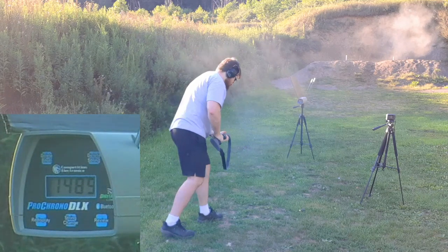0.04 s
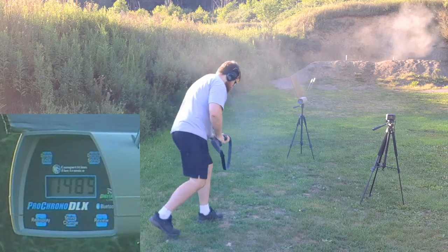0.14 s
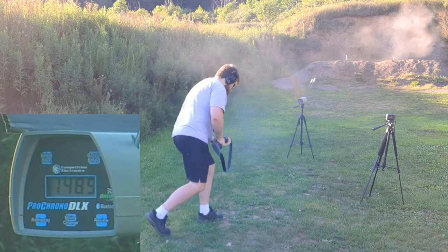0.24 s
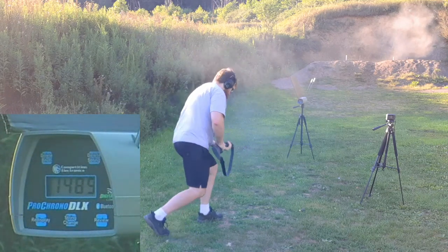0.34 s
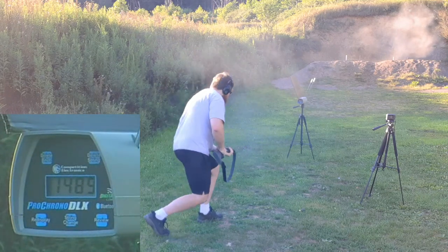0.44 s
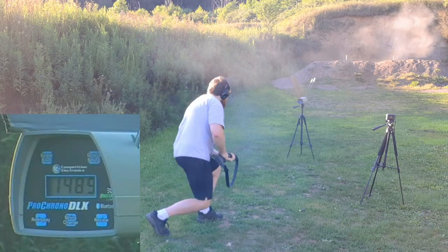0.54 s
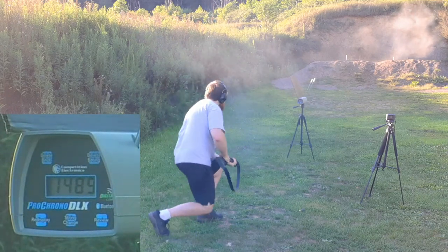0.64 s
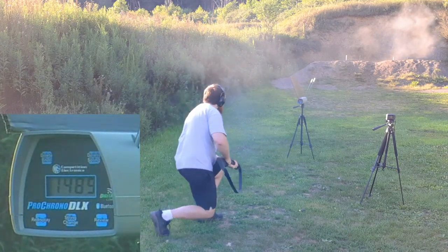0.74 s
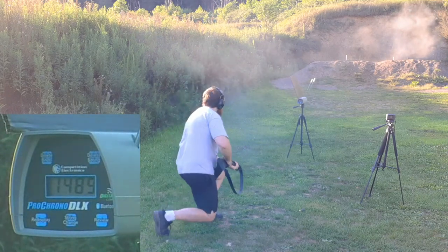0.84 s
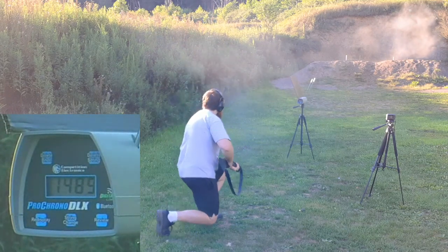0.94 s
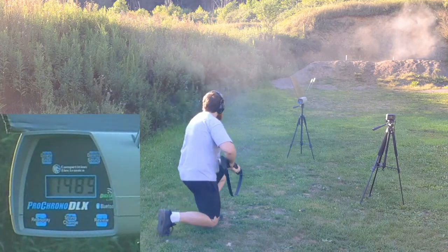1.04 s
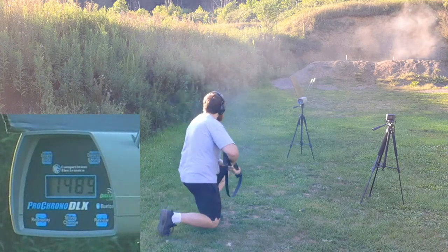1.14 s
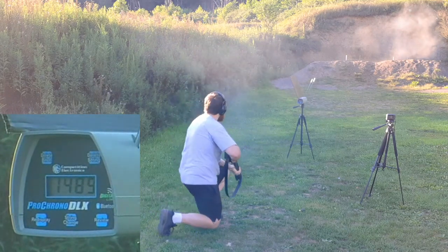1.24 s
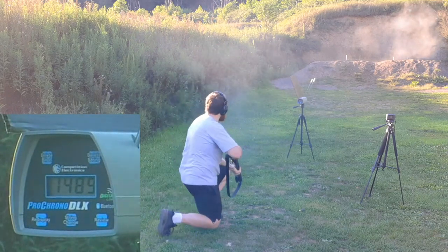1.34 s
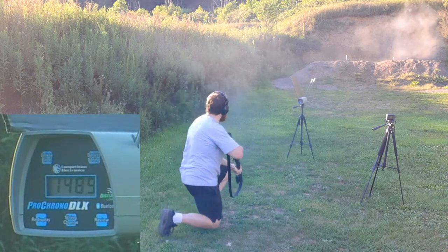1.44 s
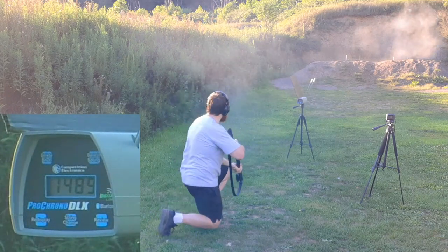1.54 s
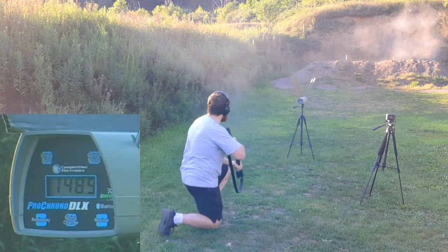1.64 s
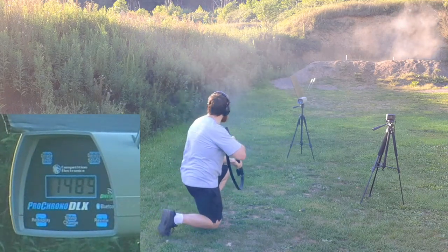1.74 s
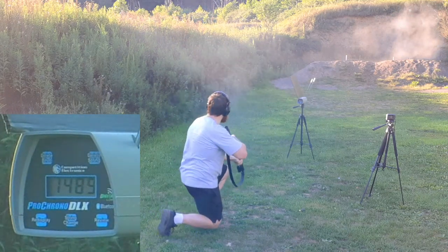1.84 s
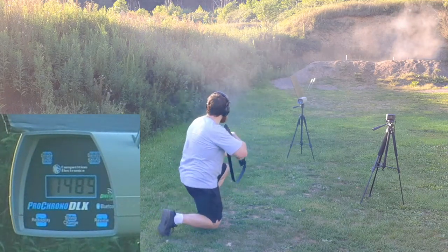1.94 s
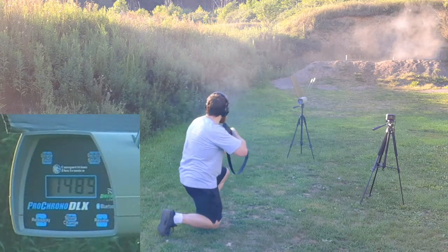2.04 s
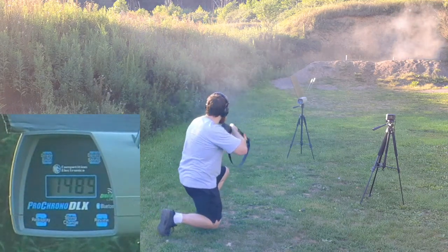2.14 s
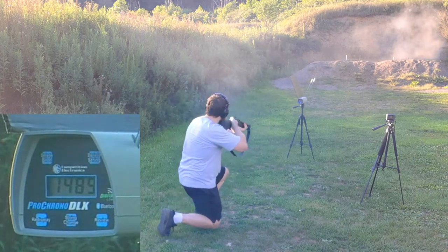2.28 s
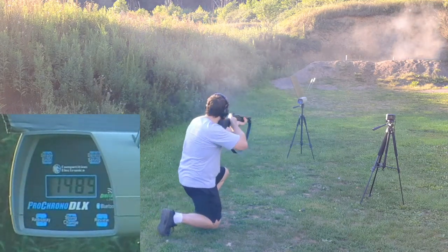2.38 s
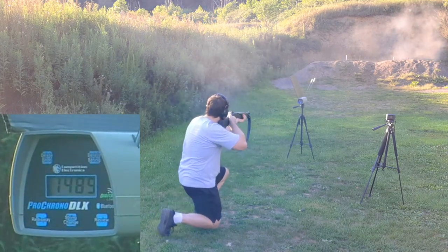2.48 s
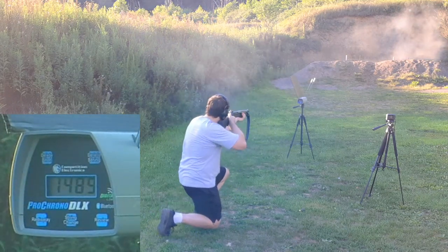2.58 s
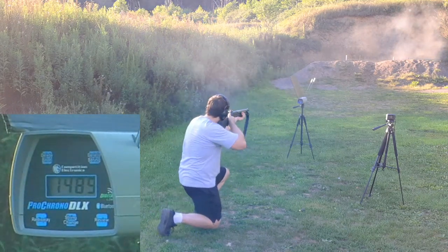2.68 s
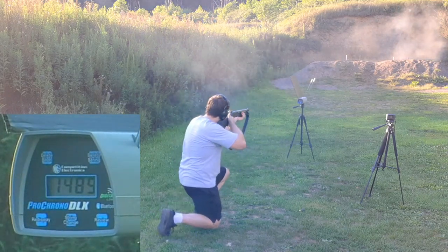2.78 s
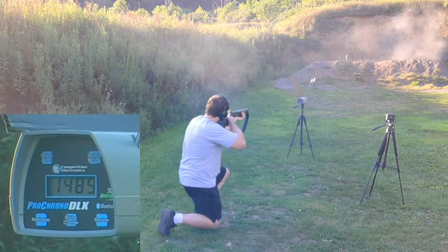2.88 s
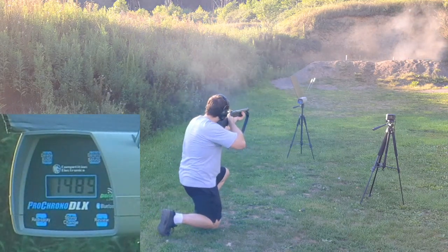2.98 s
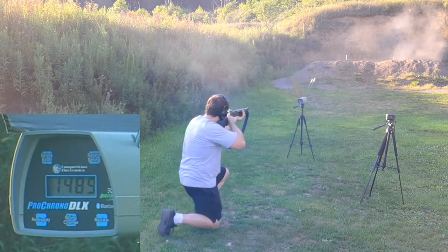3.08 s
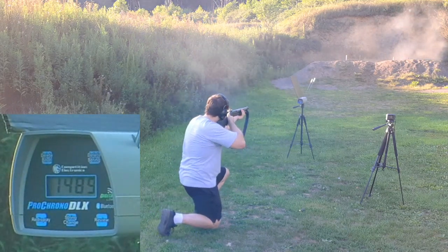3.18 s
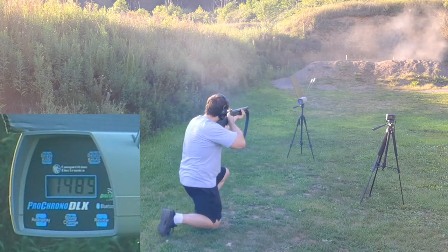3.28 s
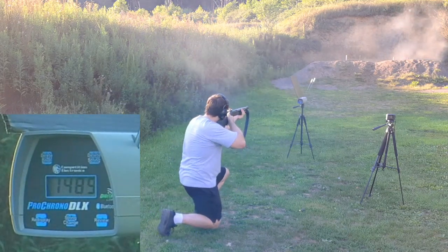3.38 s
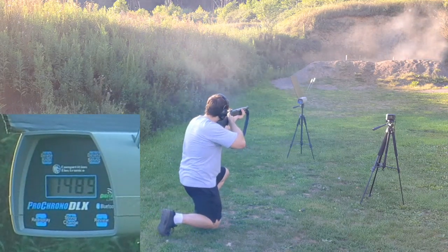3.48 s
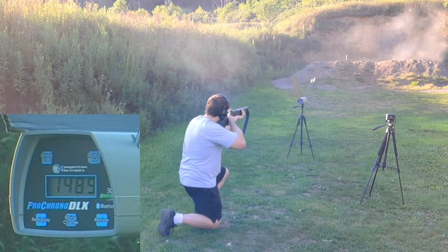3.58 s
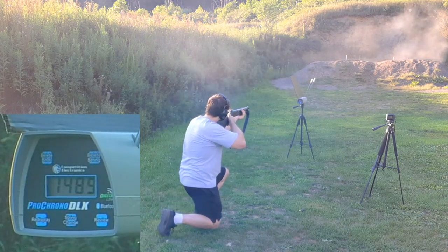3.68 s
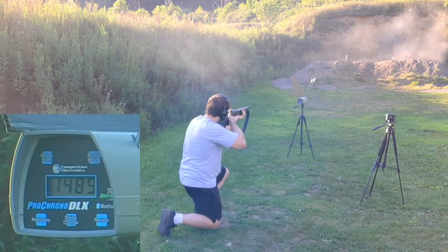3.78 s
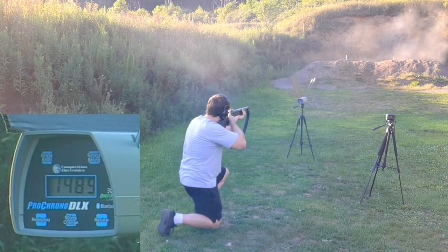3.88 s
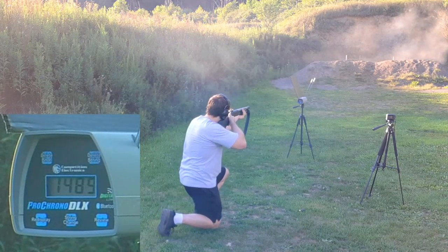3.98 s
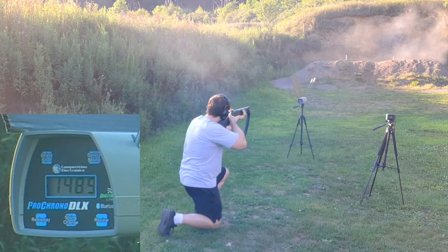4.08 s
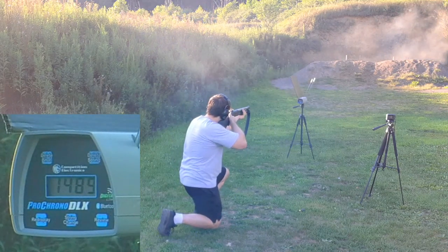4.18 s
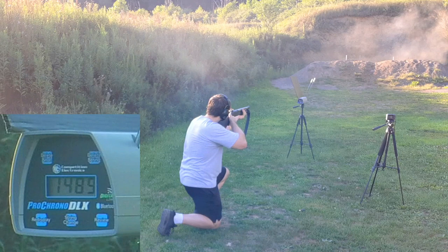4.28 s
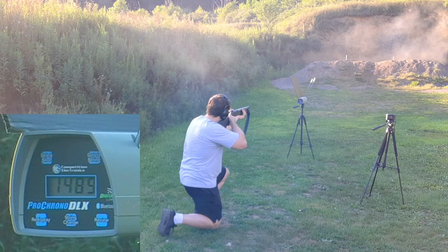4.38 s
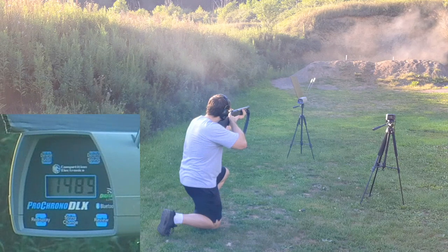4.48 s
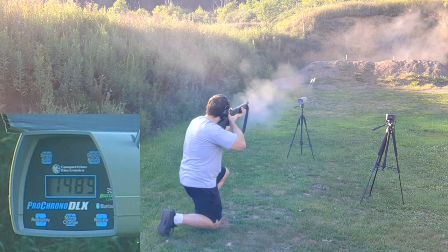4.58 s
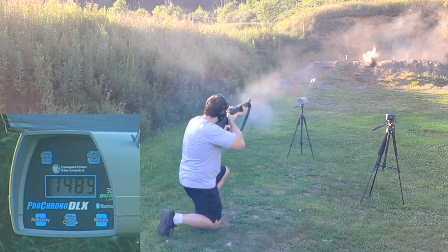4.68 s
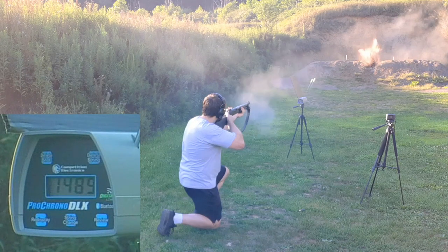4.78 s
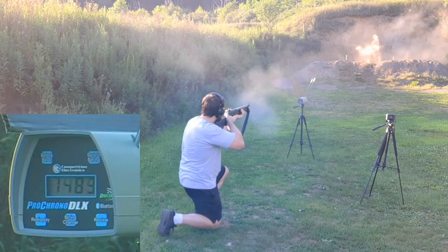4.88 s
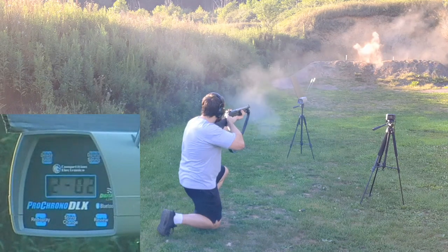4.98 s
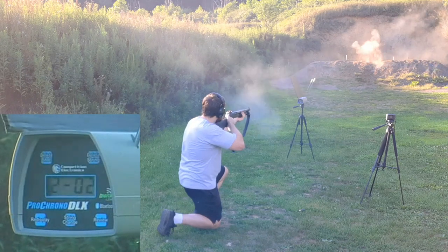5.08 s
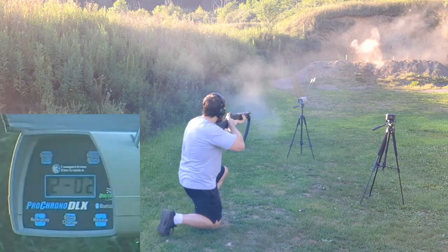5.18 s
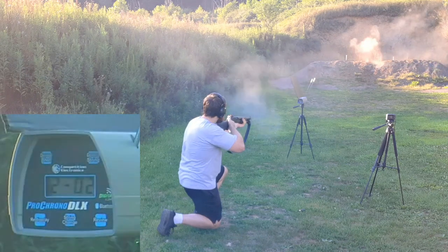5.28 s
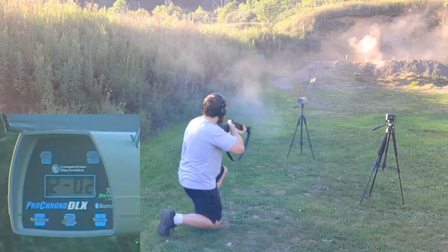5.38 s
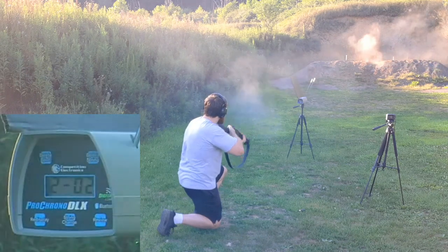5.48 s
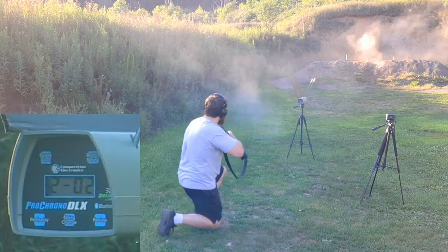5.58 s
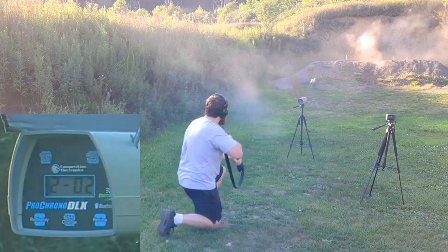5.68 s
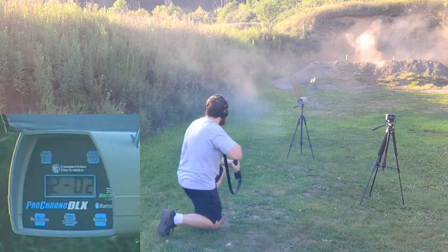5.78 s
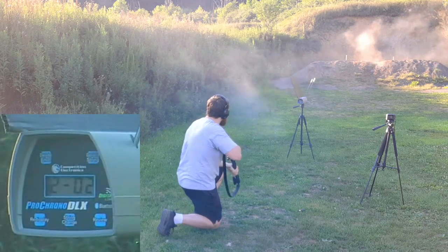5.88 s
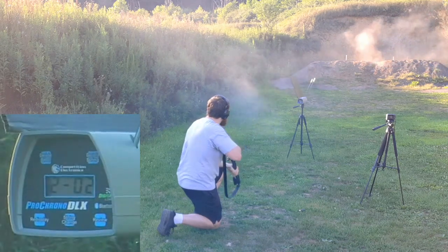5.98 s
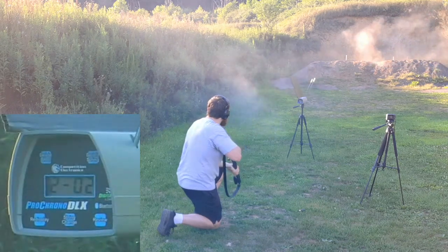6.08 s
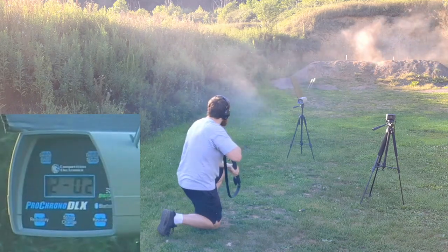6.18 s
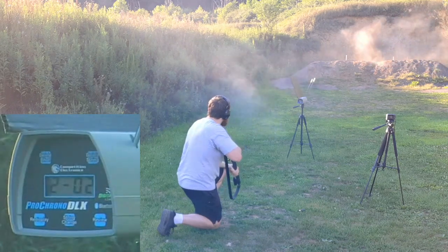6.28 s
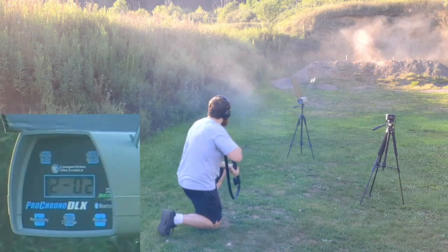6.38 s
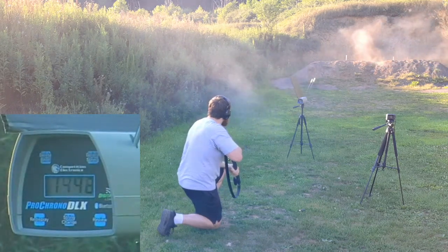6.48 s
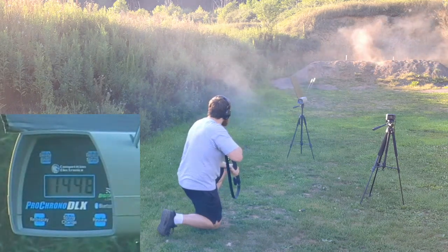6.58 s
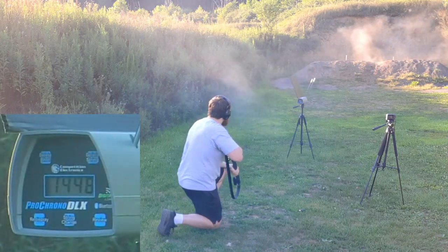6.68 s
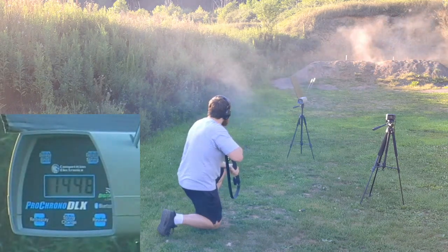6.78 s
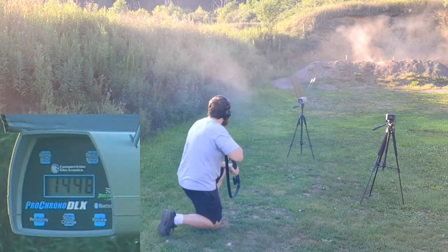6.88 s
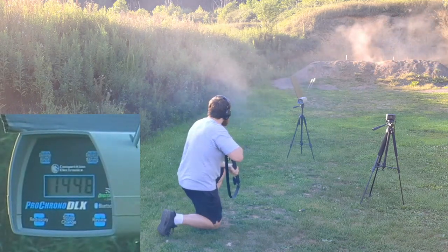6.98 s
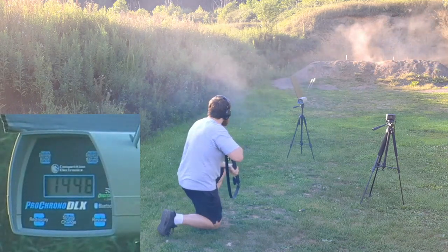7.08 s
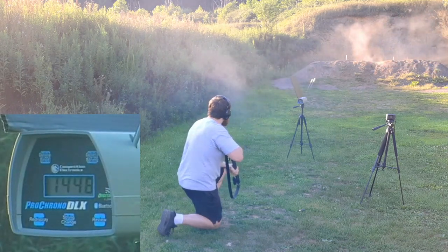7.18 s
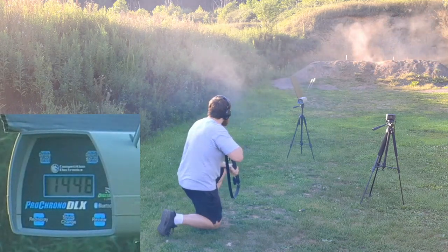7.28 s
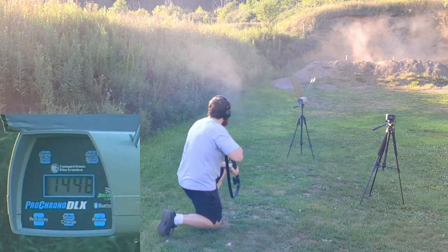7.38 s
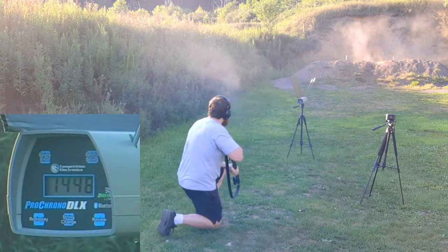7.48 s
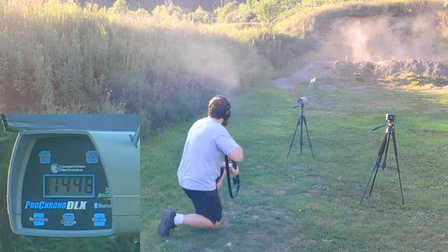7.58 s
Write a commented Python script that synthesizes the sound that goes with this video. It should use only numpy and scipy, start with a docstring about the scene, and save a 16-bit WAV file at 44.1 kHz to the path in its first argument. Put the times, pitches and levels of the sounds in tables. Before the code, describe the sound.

Outdoors on a grassy range in the evening, faint crickets chirp and trill over a high insect buzz and soft hiss. Small, dry metal clicks come from a gun being handled. After a quiet wait, a shotgun fires a few metres from the microphone, very loud, its wide stereo roar bouncing off banks and slopes and growing dull and lumpy. Clicks follow as the insects thinly return.

```python
"""A summer evening on a grassy range: crickets chirp and trill, and an insect chorus and air hiss lie behind.
A dying rustle of cloth comes first, then rasping katydids and clicks of a gun's metal, rung by short contacts.
At 4.8 s a shotgun fires, heard from a few metres behind; banks, scrub and far slopes return filtered noise
and pulses as a roar that turns dull and lumpy. The chorus and air treble sink: the upper band and treble
slowly return, the lower band stays down. More clicks follow while single crickets sing on."""
import sys
import numpy as np
from scipy import signal
from scipy.fft import rfft, irfft
from scipy.io import wavfile
from scipy.ndimage import uniform_filter1d

SR = 44100
rng = np.random.default_rng(int(sys.argv[2]) if len(sys.argv) > 2 else 0)


def file_out(sig):
    """Save sig as 16-bit WAV at sys.argv[1]."""
    # one column per channel
    cols = np.atleast_2d(sig).T
    # limit, then scale
    lim = np.clip(cols, -1, 1)
    pcm = np.round(lim * 32767).astype(np.int16)
    wavfile.write(sys.argv[1], SR, pcm)


N = 336483
T = np.arange(N) / SR  # s
HZ = np.arange(N // 2 + 1) * SR / N + 1e-3  # bin frequencies, kept above zero for the logarithms
SHOT_S = 4.7968


def undb(db):
    """Decibel law: amplitude ratio of a level."""
    return 10 ** (np.asarray(db) / 20)


def pan(x, db):
    """Interaural level difference: left and right copies, left db above right."""
    return x * undb(np.array([[db / 2], [-db / 2]]))


def ramp(start, length):
    """Linear transition: 0 before start, 1 after a further length seconds."""
    return np.clip((T - start) / length, 0, 1)


def colour(points):
    """Spectral shaping: gain per bin, interpolated in dB over log frequency."""
    hz, db = np.transpose(points)
    return undb(np.interp(np.log(HZ), np.log(hz), db))


def noise(side):
    """Mid-side decorrelation: spectra of left and right noise with the given side-to-mid ratio."""
    mid, off = rfft(rng.standard_normal((2, N)))
    return np.array([mid + side * off, mid - side * off])


def band(hz, width_hz, side_db):
    """Band-limited noise: a stereo Gaussian band scaled to rms 1."""
    bell = np.exp(-((HZ - hz) / width_hz) ** 2)
    x = irfft(noise(undb(side_db)) * bell, N)
    return x / x.std()


def walk(rate):
    """Random modulation: levels held 1 / rate s, smoothed twice, with spread 1."""
    hold = int(SR / rate)
    x = np.repeat(rng.standard_normal(N // hold + 1), hold)
    x = uniform_filter1d(uniform_filter1d(x, hold), hold)[:N]
    return x / x.std()


def add(out, s, sound):
    """Superposition: mix a short sound in at time s."""
    i = int(np.clip(s * SR, 0, N))
    out[..., i:i + sound.shape[-1]] += sound[..., :N - i]


# Spectrum of the first returns. Each row: frequency in Hz, density in dB per Hz (relative).
BLAST_SPECTRUM = [(18, -40.5), (30, -9.5), (139, -1.5), (255, -7), (388, 0), (506, -2.5), (562, -0.5),
                  (1450, -5.5), (1890, -4), (2400, -8), (3380, -5.5), (5740, -2), (14100, -16.5),
                  (15200, -17.5), (16500, -59)]
# Stereo width of the roar. Each row: frequency in Hz, side minus mid in dB.
ROAR_WIDTH = [(60, -11), (110, -15), (200, -4), (380, -7), (700, -1.5), (1290, -4), (2380, -4), (4400, -12),
              (8120, -9.5), (15000, 4)]
BLAST_DB = -14.5  # rms of the source, before its path losses


def scattered_blast():
    """Multiple scattering: the blast returns as diffuse noise mixed with separate random pulses."""
    # every bush and bank returns its own pulse: about 400 a second, uneven in size and side
    arrival, size, side = rng.random((3, N))
    pulses = (arrival < 400 / SR) * (2 * size - 1)
    sides = 1 + .5 * np.array([[1], [-1]]) * (2 * side - 1)
    pulses = rfft(pulses * sides) / pulses.std()
    # pulses stand out where the echo is strongest
    share = np.clip(.5 * np.exp(-np.log2(HZ / 520) ** 2), 0, 1)
    wash = noise(colour(ROAR_WIDTH))
    source = (np.sqrt(share) * pulses + np.sqrt(1 - share) * wash) * colour(BLAST_SPECTRUM)
    return source * undb(BLAST_DB) / irfft(source, N).std()


# Single reflections standing out of the roar.
# Each row: time in seconds, nominal peak in dB, frequency in Hz, left minus right in dB.
REFLECTIONS = [(4.8082, -21, 570, -7), (4.82, -19, 125.7, -1), (4.8333, -17, 247, 1),
               (4.8516, -17, 288, -2), (4.9325, -10, 320, 3), (4.9406, -5.5, 1090, 2),
               (4.9773, -6.5, 1240, 2), (4.992, -18, 125, -1), (4.9955, -22, 200, -3),
               (5.035, -9, 4200, -1), (5.0734, -7.5, 650, 2), (5.0816, -18, 440, -2), (5.1118, -9, 950, 0),
               (5.124, -13.5, 860, 1), (5.1891, -15, 393, 5), (5.242, -20, 550, -6),
               (5.2775, -18.5, 505, 5), (5.2893, -20.5, 460, -4), (5.3355, -21.5, 463, 5),
               (5.3716, -20.5, 503, -5), (5.7644, -25.5, 518, 4), (5.8397, -28.5, 559, -0.5),
               (6.073, -30.5, 460, -3), (6.0952, -32, 475.3, 1), (6.1285, -35, 710, 3),
               (6.228, -32.5, 478, 0), (6.4202, -40, 380, -2.5), (6.7497, -43, 398, 0.5),
               (6.975, -40, 460, -3)]


def single_reflections():
    """Specular reflection: each strong surface returns a brief pressure pulse."""
    out = np.zeros((2, N))
    t = T[:3000] - T[1500]
    for when, peak_db, hz, pan_db in REFLECTIONS:
        pulse = np.exp(-(t * hz / 1.13) ** 2) * np.sin(2 * np.pi * hz * t)
        add(out, when - T[1500], pan(undb(peak_db) * pulse, pan_db))
    return out


# Course of the returning roar. Each row: time in seconds, level relative to the first returns in dB,
# treble loss above the knee in dB per octave.
RETURN_COURSE = [(4.8, 2, 2), (4.92, -0.5, -1), (4.98, 0, 0), (5.03, -1, -1), (5.075, 0.5, 0.5),
                 (5.125, -2, 1.5), (5.17, -11.5, 1.5), (5.2, -5, 2.5), (5.25, -12, 1), (5.3, -9, 2.5),
                 (5.4, -11.5, 3), (5.55, -15.5, 4), (5.75, -19.5, 5), (5.95, -20.5, 4.5), (6.05, -19, 4.5),
                 (6.13, -19.5, 4.5), (6.22, -18.5, 5), (6.33, -22, 7), (6.45, -20, 7), (6.651, -24.5, 10),
                 (6.85, -28, 10.5), (7.1, -27.5, 14.5), (7.301, -34.5, 16), (7.63, -42.5, 16)]
# distant ground returns little bass: a bell-shaped dip over log frequency
THIN_S, THIN_OVER_S, THIN_DB, THIN_HZ, THIN_OCT = 5.0, .05, -26, 180.4, 0.63
FILL_S, FILL_WIDTH_S, FILL_DB = 6.4, .5, 15  # the far slope brings some bass back
KNEE_HZ, KNEE_SINK_OCT_PER_S = 596, 0.11  # the knee sinks as the echo comes from further off
BOOM_DB, BOOM_DROP_DB, BOOM_DROP_S, BOOM_DB_PER_S = 8.5, 10.5, .1, 21  # the deepest boom dies on its own
SURGE_FROM_S, SURGE_GROW_S = 5.05, 0.18  # the returns flutter more once they thin out
# Air loss at 10 kHz, growing with frequency squared, relative to the first returns' mean delay;
# near scrub keeps scattering, so the loss eases off.
AIR_DB_PER_S, AIR_FROM_S, AIR_EASE_S = 98.5, 0.079, 0.48


def roar():
    """Outdoor reverberation: bands of the scattered blast fade by path length, ground and air absorption."""
    s, level_points, dull_points = np.transpose(RETURN_COURSE)
    level_db = np.interp(T, s, level_points)
    dull_db = np.interp(T, s, dull_points)
    since = np.maximum(T - SHOT_S, 0)
    fill_db = FILL_DB * np.exp(-((T - FILL_S) / FILL_WIDTH_S) ** 2)
    thin_db = ramp(THIN_S, THIN_OVER_S) * (THIN_DB + fill_db)
    air_db = AIR_DB_PER_S * (AIR_EASE_S * (1 - np.exp(-since / AIR_EASE_S)) - AIR_FROM_S)
    boom_db = BOOM_DB - BOOM_DROP_DB * (1 - np.exp(-since / BOOM_DROP_S)) - BOOM_DB_PER_S * since
    flutter_db = 1.3 + 0.87 * ramp(SURGE_FROM_S, SURGE_GROW_S)

    source = scattered_blast()
    centres = np.array([90, 170, 270, 420, 660, 950, 1900, 3500, 5300, 7300, 10500, 14500])  # Hz
    out = 0
    for k, hz in enumerate(centres):
        # neighbouring bands cross over at constant power
        weight = np.interp(np.log(HZ), np.log(centres), np.arange(len(centres)) == k)
        part = irfft(source * np.sin(np.pi / 2 * weight), N)
        if k == 0:
            fade_db = boom_db
        else:
            octaves_above = np.maximum(np.log2(hz / KNEE_HZ) + KNEE_SINK_OCT_PER_S * since, 0)
            fade_db = level_db - dull_db * octaves_above - air_db * (hz / 10000) ** 2
            fade_db = fade_db + thin_db * np.exp(-(np.log2(hz / THIN_HZ) / THIN_OCT) ** 2)
        out = out + part * undb(fade_db + flutter_db * walk(40))
    return out * ramp(SHOT_S, 0.00031) + single_reflections()


# Handling of the gun. Each row: time in seconds, peak in dB, brightest frequency in Hz,
# decay time constant of the rattle in ms.
HANDLING_CLICKS = [(.7594, -48, 3000, 3.2), (1.4278, -43, 4200, 1.5), (1.74, -33.5, 5500, 0.81),
                   (1.7422, -36, 3640, 4.8), (1.7692, -47, 5200, 0.89), (2.0572, -37.5, 2800, 2.1),
                   (2.0572, -39.5, 4900, 1.8), (2.183, -49, 3320, 2.1), (2.3258, -43.5, 3600, 4.1),
                   (5.784, -33, 4500, 3.9), (5.793, -27.5, 4820, 4.9), (7.263, -35.5, 6300, 2.1),
                   (7.267, -47.5, 2800, 5.4)]
# Resonances of the steel parts.
# Each row: frequency in Hz, level in dB before each click's own weighting, 60 dB decay time in seconds.
STEEL_MODES = [(1600, 1, 0.0069), (2480, -0.5, 0.0078), (2930, -3.5, 0.0078), (3710, 2, 0.0066),
               (4500, 13.5, 0.0032), (5160, 10.5, 0.0039), (6460, 3, 0.0059), (8120, 10.5, 0.0022),
               (12000, -11, 0.0054)]


def clicks():
    """Modal excitation: each click is a short rattle of contacts ringing the same steel parts."""
    out, t = np.zeros(N), T[:3000]
    for when, peak_db, brightest_hz, rattle_ms in HANDLING_CLICKS:
        ring = 0
        for hz, db, t60 in STEEL_MODES:
            gain = undb(db - 10.3 * np.log2(hz / brightest_hz) ** 2)
            ring = ring + gain * np.exp(-np.log(1000) * t / t60) * np.sin(2 * np.pi * hz * t)
        ring *= 1 - np.exp(-t / 0.00067)  # the contact is not quite instant
        contacts = rng.standard_normal(len(t)) * np.exp(-t * 1000 / max(rattle_ms, .2))
        sound = signal.fftconvolve(contacts, ring)[:len(t)]
        add(out, when, undb(peak_db) * sound / np.abs(sound).max())
    return out


def song(times, strokes, hz, drop_hz, pan_db):
    """Stridulation: wing strokes give near-pure tones that sag in pitch as the file slows."""
    out = np.zeros(N)
    for when, (tune, vary) in zip(times, rng.standard_normal((len(times), 2))):
        for start, length, db in strokes:
            u = np.arange(0, 1, 1 / (length * SR))  # progress through the stroke
            pitch_hz = hz * (1 + 0.0036 * tune) - drop_hz * u ** 2.6
            phase = 2 * np.pi * np.cumsum(pitch_hz) / SR
            shape = np.sin(np.pi * u ** 0.81) ** .8
            add(out, when + start, undb(db + 1.9 * vary) * shape * np.sin(phase))
    return pan(out, pan_db)


# Chirp centres of three crickets and single-stroke centres of a faint one. Each row: time in seconds.
LOW_CHIRPS = [0.573, 1.287, 2.191, 2.837, 4.001, 4.604, 5.842, 6.883, 7.46]
HIGH_CHIRPS = [0.384, 0.704, 1.073, 1.466, 1.823, 2.147, 2.504, 2.876, 3.175, 3.466, 3.837, 4.191, 4.539,
               5.506, 5.889, 6.291, 6.667, 6.985, 7.334, 7.604]
FAR_CHIRPS = [.406, .824, 1.204, 1.56, 1.932, 2.286, 2.711, 3.178, 3.554, 3.87, 4.25, 4.63, 6.738, 7.166,
              7.556]
FAINT_STROKES = [1.403, 2.44, 3.56, 3.944, 4.279, 4.685, 6.785, 6.825, 7.166, 7.209]
# Wing strokes of one chirp.
# Each row: start relative to the chirp centre in seconds, length in seconds, mean level in dB before panning.
LOW_CHIRP_STROKES = [(-.082, 0.0106, -67), (-.05, 0.02, -54), (-.012, 0.026, -52), (0.034, 0.029, -52.5)]
HIGH_CHIRP_STROKES = [(-.047, 0.021, -52), (-.01, 0.0202, -51.5), (.028, .023, -52)]
# Spans of trill. Each row: start in seconds, end in seconds, strokes per second.
TRILL_SPANS = [(0, 4.8, 72.6), (5.5723, 7.62, 74.4)]


def crickets():
    """Stridulation with scattering: chirps and a trill, blurred faintly by the grass."""
    low = song(LOW_CHIRPS, LOW_CHIRP_STROKES, 4590, 530, -4.8)
    # a fainter arrival, sides swapped, leads each stroke by 13 ms
    out = low + undb(-6.5) * np.roll(low[::-1], -int(0.013 * SR), axis=1)
    out += song(HIGH_CHIRPS, HIGH_CHIRP_STROKES, 5276, 470, 0.45)
    out += song(FAINT_STROKES, [(-.012, 0.02, -64)], 4870, 350, 0.1)
    far_strokes = [(-.03, 0.012, -74), (-.012, 0.012, -66), (.006, .014, -67.5)]
    out += song(FAR_CHIRPS, far_strokes, 6800, 250, 0.1)
    for start, end, rate in TRILL_SPANS:
        out += song(np.arange(start, end, 1 / rate), [(0.0031, 0.0074, -62)], 5900, 450, -1.2)
    blur = rng.standard_normal((2, 2200)) * np.exp(-T[:2200] / 0.0131)  # scatter in the grass
    return out + undb(-35.0) * signal.fftconvolve(out, blur, axes=1)[:, :N]


# Ticking katydids. Each row: start in seconds, end in seconds, ticks per second,
# band centre in Hz, level in dB before the beat and panning.
TICKING = [(.063, 2.49, 17.9, 8950, -62), (3.985, 4.79, 18.3, 8800, -64), (5.815, 7.63, 19.05, 8200, -63)]
# Centres of the katydid rasps. Each row: time in seconds.
RASP_TIMES = [.236, .43, .647, .874, 1.099, 1.324, 1.56, 1.794, 2.041, 2.405, 2.66, 2.925]


def katydids():
    """Amplitude modulation: narrow noise bands are gated into ticks and rasps."""
    out = np.zeros((2, N))
    for start, end, rate, hz, db in TICKING:
        beat = (.5 + .5 * np.cos(2 * np.pi * rate * (T - start))) ** 2
        beat = beat * (T > start - .02) * (T < end)
        out += pan(undb(db) * beat * band(hz, 150, 0.5), 6.9)
    rasp = sum(np.exp(-((T - s) / 0.034) ** 2) for s in RASP_TIMES)
    return out + undb(-68.0) * rasp * band(9900, 250, 3)


def chorus(upper_db, lower_db):
    """Incoherent summation: many insects merge into throbbing noise bands, over a steady low band."""
    throb = np.sin(2 * np.pi * np.cumsum(22.0 + 1.5 * walk(2.5)) / SR)
    upper = band(8260, 360, -1.3) * undb(0.89 * throb) + 0.67 * band(7945, 500, -1.7)
    out = pan(undb(upper_db + 2.0 * walk(36)) * upper, 2.0)
    buzz = np.sin(2 * np.pi * np.cumsum(71 + 3.3 * walk(3.5)) / SR)
    out += undb(lower_db + 0.64 * walk(66) + 3.2 * buzz) * band(5587, 410, -6.5)
    return out + undb(-73 + 0.27 * walk(2.8)) * band(1422, 180, -25.0)


# Spectrum of the outdoor hiss. Each row: frequency in Hz, density in dB per Hz (relative).
AIR_SPECTRUM = [(18, -33), (30, -1.5), (112, -2), (1090, -12), (1940, -15), (4180, -16.5), (6400, -13.5),
                (9200, -22), (11100, -21.5), (14100, -26.5), (16500, -48.5)]
# Stereo width of the hiss. Each row: frequency in Hz, side minus mid in dB.
AIR_WIDTH = [(60, -13), (700, -14.5), (1300, -24.5), (4000, -15), (7000, -5.5), (15000, -4)]
AIR_DB = -65.5  # rms of the hiss without its variable treble


def air(hiss_db):
    """Broadband ambient noise: steady hiss with variable treble; a rustle of cloth dies away at first."""
    shape = colour(AIR_SPECTRUM) * noise(colour(AIR_WIDTH))
    plateau = np.clip(np.minimum(HZ / 3000 - 2, 6.5 - HZ / 2000), 0, 1)  # 6 to 13 kHz
    high = plateau * .7 + .3 * (HZ > 9000)
    low, top = irfft(shape * (1 - high), N), irfft(shape * high, N)
    hiss = (low + top * undb(hiss_db)) * undb(AIR_DB) / low.std()
    rustle = np.exp(-T / 0.087) * band(4900, 1700, -10)
    rustle += 1.07 * np.exp(-(T / 0.071) ** 2) * band(7600, 5800, -1.5)
    return hiss + undb(-52.0) * rustle


UPPER_DB, LOWER_DB, HISS_DB = -60, -60.5, 2.5  # chorus bands and air treble before the blast
DIP_FALL_S, DIP_RISE_S = .75, 1.6  # the dip deepens, then lifts
UPPER_DIP_DB, HISS_DIP_DB, HISS_AFTER_DB = 16, 20.5, -1
LOWER_DROP_DB, LOWER_FALL_S = 17.5, .2  # the lower band stays down


def scene():
    """Superposition: the blast and the gun over an evening whose insects and air treble sink after the shot."""
    dip = ramp(SHOT_S, DIP_FALL_S) - ramp(SHOT_S + DIP_FALL_S, DIP_RISE_S)
    upper_db = UPPER_DB - UPPER_DIP_DB * dip
    lower_db = LOWER_DB - LOWER_DROP_DB * ramp(SHOT_S, LOWER_FALL_S)
    hiss_db = HISS_DB - HISS_DIP_DB * dip + HISS_AFTER_DB * ramp(SHOT_S, DIP_FALL_S)
    return roar() + clicks() + crickets() + katydids() + chorus(upper_db, lower_db) + air(hiss_db)


TOP_HZ = 16200  # upper edge of the passband


def record(dry):
    """Saturation and low-pass filtering: the loudest peaks are rounded and the top is cut."""
    rounded = np.tanh(0.8 * dry) / 0.78
    low_pass = signal.ellip(10, .2, 80, TOP_HZ, fs=SR, output="sos")
    return signal.sosfilt(low_pass, rounded)


dry = scene()
out = record(dry)
file_out(out)
```